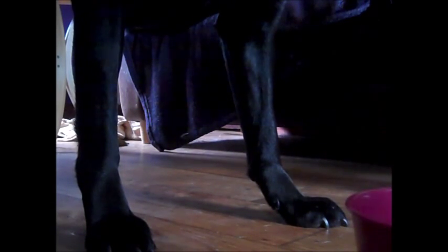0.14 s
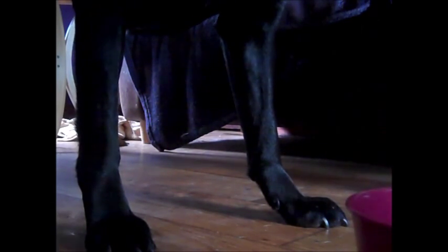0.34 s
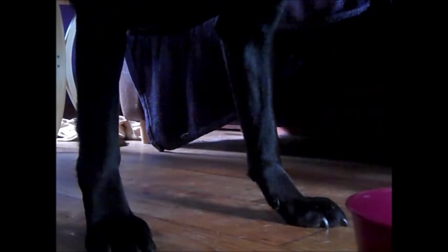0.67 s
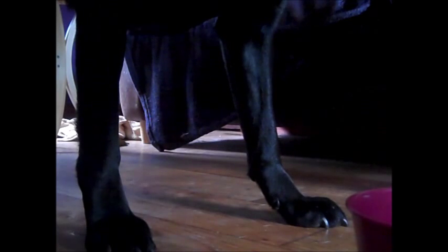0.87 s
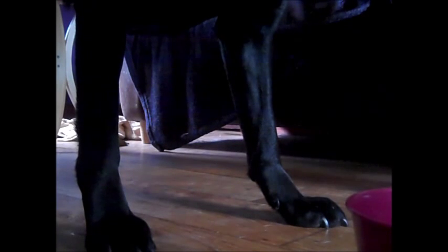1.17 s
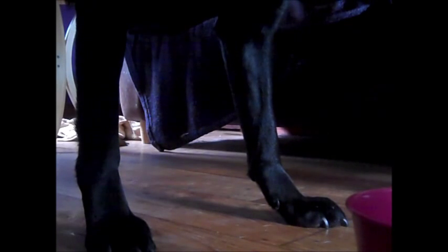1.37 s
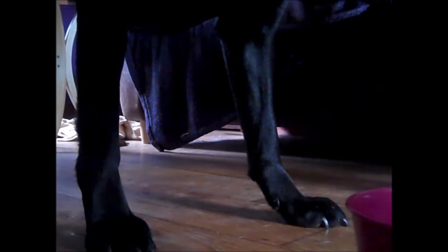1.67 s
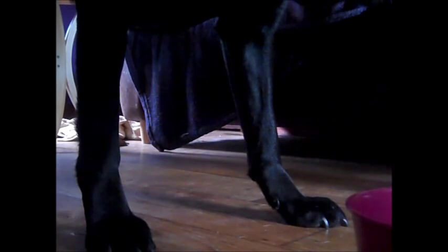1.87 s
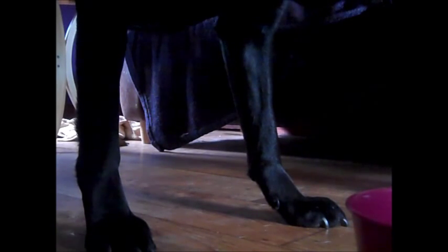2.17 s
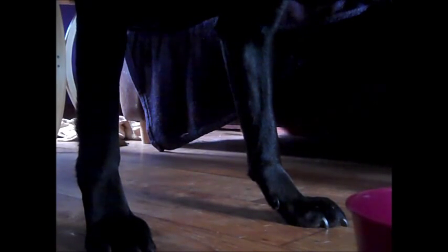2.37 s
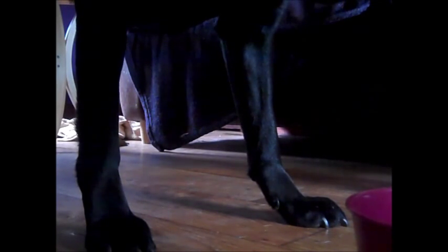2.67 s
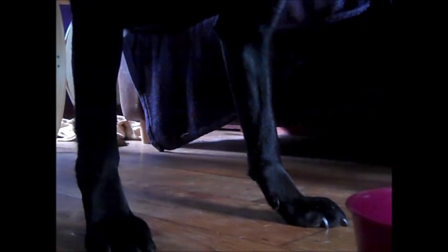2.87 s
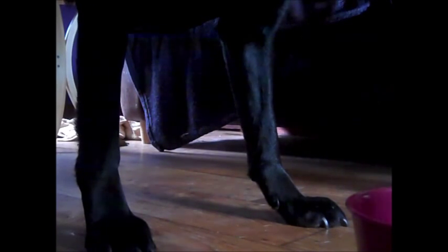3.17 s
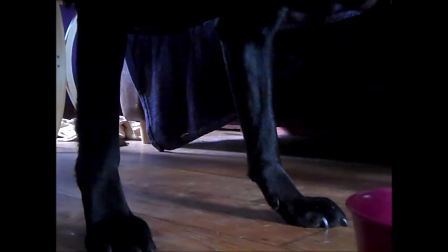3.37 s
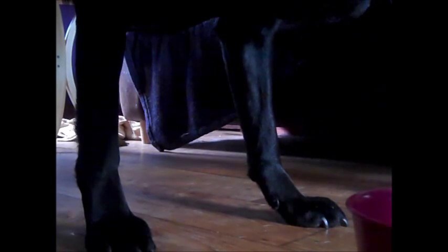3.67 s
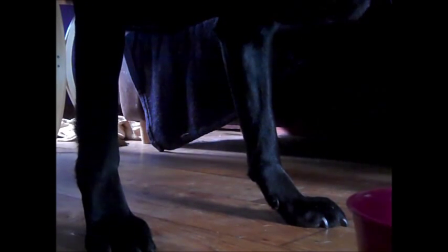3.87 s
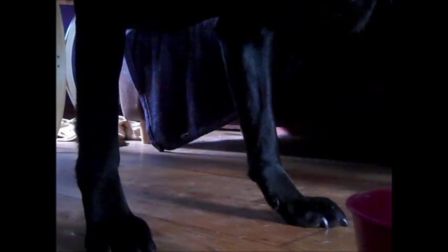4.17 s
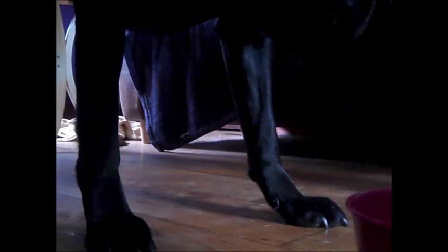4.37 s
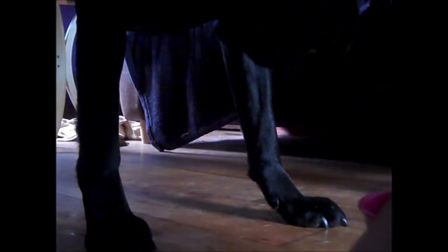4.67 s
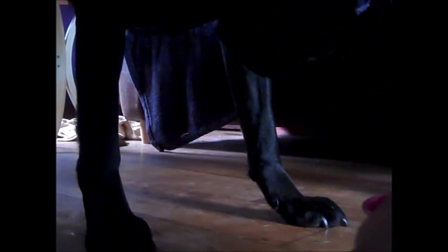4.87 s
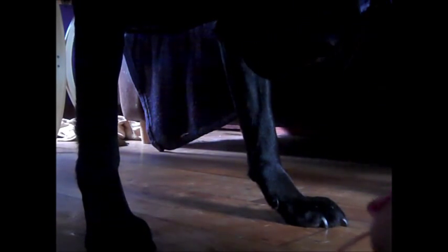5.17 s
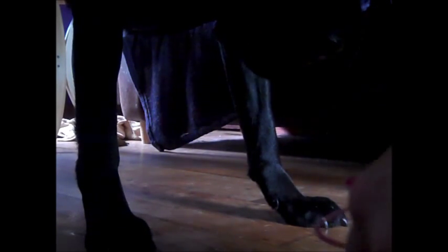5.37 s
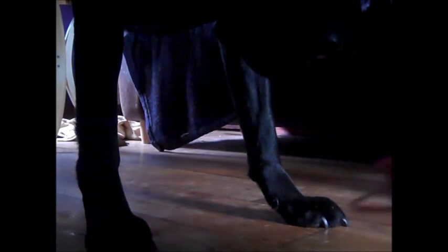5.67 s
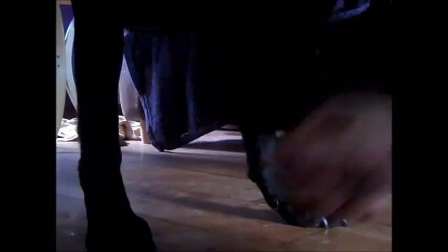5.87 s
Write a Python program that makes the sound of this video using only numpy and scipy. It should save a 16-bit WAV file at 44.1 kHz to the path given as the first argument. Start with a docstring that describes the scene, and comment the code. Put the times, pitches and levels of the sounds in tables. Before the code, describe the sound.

A soft rustle fades into faint appliance hum and room air. Suddenly two loud, bright clacks open a plastic container, with rapid rebounds. Brief lid handling leads to grainy scooping of dry pet food: rustling crunches, clicks and hollow plastic knocks, then freer rattling as the scoop lifts clear. Heard very close, a little right of centre, in a small furnished room, with the loudest peaks slightly clipped.

```python
"""A soft rustle dies away over a faint hum and the air of a quiet room, where dry pet food is served.
Two sharp snaps follow: latches crack open, rebound, and set a plastic tub and its lid ringing.
Then a hollow scoop digs: rubbing pellets are dense random contacts shaped by filters, while
scraping and single blows excite the modes of the scoop's wall and the air of its cavity.
Each nearby source reaches two ports with a small lag, early reflections and a diffuse tail."""
import sys
import numpy as np
from scipy import signal
from scipy.fft import rfft, irfft, next_fast_len
from scipy.io import wavfile
from scipy.ndimage import map_coordinates

SR = 44100
rng = np.random.default_rng(int(sys.argv[2]) if len(sys.argv) > 2 else 0)


def master(y):
    """Save y as 16-bit WAV."""
    cut = np.clip(np.atleast_2d(y).T, -1, 1)
    pcm = np.round(cut * 32767)  # scale
    wavfile.write(sys.argv[1], SR, pcm.astype(np.int16))


N = 266364  # length in samples

# Latches snapping open: start_s, crack_peak_db, tub_setting_db, lid_setting_db
# (the last two are relative to the crack, before the trims in latches)
LATCH_SNAPS = [(2.7003, 8, -6, -11.5), (2.848, 7.5, -34, -2.5)]
# Bending modes of the tub, then of its lid: centre_hz, width_hz, level_db
TUB_MODES = [(4620, 220, -6), (4890, 240, 0)]
LID_MODES = [(1434, 220, -3.5), (1534, 160, 0), (1766, 60, 2), (2550, 250, -6), (6130, 240, 3)]
# A latch rebounds at even steps; all rebounds lose REBOUND_DB of crack, and each one adds the losses below
BOUNCE_S, REBOUND_DB = 0.0116, 17
CRACK_LOSS_DB, TUB_LOSS_DB, LID_LOSS_DB = 3.5, 2.5, 5.5

# Hands taking hold of the lid: start_s, length_s, hiss_setting_db (before a trim), flex_db
LID_GRIPS = [(2.605, .1, -30, -39), (2.773, .06, -40, -46), (2.934, 0.028, -43, -33),
             (3.012, 0.25, -49, -53.5), (3.094, 0.023, -45, -51.5), (3.273, 0.014, -32, -58),
             (3.379, 0.061, -37.5, -51)]
GRIP_RISE_S, GRIP_T60_S = 0.018, 0.33
# Thin squeaks of the lid: centre_s, half_length_s, level_db, pitch_hz
LID_SQUEAKS = [(2.948, 0.0058, -29.5, 8280), (3.41, 0.017, -39, 8320)]
# Soft bumps of the tub and bowl: start_s, peak_db, top_hz, t60_s
SOFT_BUMPS = [(2.648, -29, 219, 0.27), (2.951, -24.5, 90, 0.14), (3.109, -32, 61, 0.25),
              (4.741, -26, 340, 0.28), (4.935, -34.5, 454, 0.21), (5.715, -31, 343, 0.1)]

# Strokes that set the kibble moving: start_s, rise_s, length_s (rise included), level_db,
# pressure_db (on the scoop); the layers in digging add trims of their own
SCOOP_STROKES = [(3.467, 0.015, 0.059, -27.5, -8.5), (3.578, 0.051, 0.054, -25, -4.5),
                 (3.738, 0.034, .09, -26, -5), (3.8, 0.038, 0.12, -20.5, -5.5),
                 (3.96, 0.034, 0.07, -30, -7), (4.033, 0.018, 0.32, -31.5, -17),
                 (4.37, 0.022, 0.085, -42.5, -5.5), (4.515, .04, 0.23, -34, -6.5),
                 (4.718, 0.027, 0.027, -27.5, -12), (4.808, 0.016, 0.36, -53, 1.5),
                 (4.956, 0.035, 0.042, -40.5, -4.5), (5.151, 0.064, .07, -45, -24),
                 (5.255, 0.026, 0.33, -39, 3), (5.607, 0.022, 0.089, -52, 14.5),
                 (5.717, 0.047, 0.096, -32, 0.5), (5.86, 0.033, 0.087, -37, -1)]
STROKE_T60_S = 0.28  # the pellets settle after each stroke
SCRAPE_DB, DRUM_DB = -8, -0.5  # wall and cavity, relative to level plus pressure
LIFT_S = 5.0  # the scoop is clear of the heap from here
FREE_WALL_DB = 2.5  # the wall rings more freely once clear
# Low resonance of the full tub: centre_hz, width_hz, level_db
HEAP_MODES = [(262, 125, 0)]

# Loudest pellets striking the scoop: start_s, strength_db, hardness (0 to 1)
PELLET_KNOCKS = [(3.284, -16.5, 1), (3.5372, -7.5, 0.74), (3.7796, -12, 0.81), (3.8345, -4, 0.62),
                 (3.869, -3.5, 0.6), (3.9024, -8.5, 0.18), (3.9686, -1.5, 0.6), (4.0051, -4.5, 0.72),
                 (4.0515, -12.5, 0.97), (4.0799, -5.5, .95), (4.28, -13.5, 0.88), (4.3154, -17, .95),
                 (4.5337, -14.5, 0.9), (4.6028, 3.5, 0.71), (4.6462, -12.5, 0.47), (4.6867, -1.5, 0.67),
                 (4.7524, -10.5, 0.82), (4.773, -7.5, 0.6), (5.2369, 6, 0.59), (5.2795, -10, 0.21),
                 (5.2995, -15, .2), (5.312, -15.5, 0.08), (5.3395, -15, 0.28), (5.3641, -14.5, 0.17),
                 (5.3795, -18.5, 0.06), (5.3926, 1.5, 0.94), (5.4, -7.5, .97), (5.4389, -8, .35),
                 (5.4962, -9, 0.64), (5.504, -10.5, 0.12), (5.5422, -10, 0.5), (5.5684, -1, 0.66),
                 (5.7845, -8.5, 0.3), (5.8045, -11, 0.6)]
# A dull blow loses click; a hard one loses wall and cavity
DULL_CLICK_DB, HARD_WALL_DB, HARD_CAVITY_DB = -21, -16, -35.5
SPOT_DB = 3.5  # scatter of the wall's mode levels from blow to blow
# Pitch of the air in the scoop: time_s, pitch_hz
CAVITY_PITCH = [(3.45, 678), (4.2, 695), (4.6, 640), (5.3, 678), (5.6, 718), (5.76, 783)]
# Bending modes of the scoop's wall: centre_hz, width_hz, level_db
WALL_MODES = [(1590, 226, -1), (2230, 140, 3), (2800, 370, -5), (3930, 280, -6), (5050, 380, -2.5)]
# Small ticks: start_s, peak_db
SMALL_TICKS = [(0.538, -46.5), (0.653, -45), (0.869, -48), (2.926, -20), (3.201, -31)]

# Spectra of latch crack, pellet click, rubbing kibble, sliding plastic, flexing lid and room air:
# frequency_hz, density_db (per hertz, relative)
CRACK_SPECTRUM = [(900, -12), (1450, 3), (2600, -6), (3500, -6), (4800, 6.5), (6400, -4.5), (8000, -3.5),
                  (14000, -15)]
CLICK_SPECTRUM = [(300, -55.5), (1000, -5.5), (5200, 8.5), (6800, 10.5), (9000, 3), (15000, -50)]
RUB_SPECTRUM = [(60, -31.5), (450, -9.5), (1200, -5.5), (3000, 0), (7300, -3.5), (14000, -24), (16000, -83)]
SLIDE_SPECTRUM = [(200, -44), (1500, -9), (4000, -3.5), (8300, 4), (14000, -16.5), (16000, -36)]
FLEX_SPECTRUM = [(30, 2), (150, -1.5), (400, -2.5), (900, -11.5), (6000, -38)]
AIR_SPECTRUM = [(20, -11), (65, 0), (250, -7), (1000, -17.5), (5000, -28.5), (14000, -35), (15500, -70)]

# Tones of the appliance: pitch_hz, level_db (rms)
HUM_TONES = [(59.6, -68.5), (119.6, -52.5)]
# Faint stirrings in the room: centre_s, level_db, pitch_hz
ROOM_STIRS = [(1.94, -60.5, 360), (2.05, -62, 520)]
STIR_WIDTH_HZ = 70
# Decay of the diffuse tail: frequency_hz, t60_s
ROOM_DECAY = [(5000, 0.37), (14000, 0.17)]
EARLY_DB = -21  # each early reflection from floor and furniture
# Responses of the left and right microphone ports: frequency_hz, gain_db
LEFT_PORT = [(100, -2.5), (6500, -1), (7900, 7), (9800, 3.5), (13000, -0.5)]
RIGHT_PORT = [(100, -2.5), (5000, -1.5), (6600, 6), (7900, -4), (11000, -10.5)]
TOP_HZ = 15300  # upper band edge


def latches():
    """Impact and modal ringing: each snap and its fading rebounds crack and excite the tub and lid."""
    out = np.zeros(N)
    for start, db, tub_db, lid_db in LATCH_SNAPS:
        for k in range(5):
            s = start + k * BOUNCE_S
            crack_db = db - REBOUND_DB * (k > 0) - k * CRACK_LOSS_DB
            crack = peak(coloured(burst(t60=0.015), CRACK_SPECTRUM))
            # twice through the modes, for narrower resonances
            tub = peak(resonant(resonant(burst(t60=0.023), TUB_MODES), TUB_MODES))
            lid = peak(resonant(burst(t60=0.023), LID_MODES))
            add(out, s, amp(crack_db) * crack)
            add(out, s, amp(db + tub_db - 7.5 - k * TUB_LOSS_DB) * tub)
            add(out, s, amp(db + lid_db - 6.0 - k * LID_LOSS_DB) * lid)
    return out


def handling():
    """Friction: at each grip the lid slides with a fine hiss and flexes; twice it squeaks thinly."""
    _, _, hiss_db, flex_db = np.transpose(LID_GRIPS)
    shapes = [stroke(s, GRIP_RISE_S, length, GRIP_T60_S) for s, length, _, _ in LID_GRIPS]
    contacts = grains(rate=5200, spread_db=2, t60=0.0049)
    hiss = together(hiss_db - 7, shapes) * unit(coloured(contacts, SLIDE_SPECTRUM))
    flex = together(flex_db, shapes) * noise(FLEX_SPECTRUM)
    squeaks = sum(amp(db) * swell(s, half, hz, width_hz=68) for s, half, db, hz in LID_SQUEAKS)
    return hiss + flex + squeaks


def bumps():
    """Soft impact: dull knocks of hand and plastic hold only a low band, two octaves wide."""
    out = np.zeros(N)
    for s, db, top_hz, t60 in SOFT_BUMPS:
        band = signal.butter(2, [top_hz / 4, top_hz], "bandpass", fs=SR, output="sos")
        add(out, s, amp(db) * peak(signal.sosfilt(band, burst(t60, size=16384))))
    return out


def digging():
    """Granular friction: pellets rub and crackle, scrape the scoop's wall and drum on its cavity."""
    *_, db, pressure_db = np.transpose(SCOOP_STROKES)
    shapes = [stroke(s, rise, length, STROKE_T60_S) for s, rise, length, _, _ in SCOOP_STROKES]
    motion = together(db, shapes)
    on_wall = together(db + SCRAPE_DB + pressure_db, shapes) * amp(FREE_WALL_DB * ~in_heap())
    on_cavity = together(db + DRUM_DB + pressure_db, shapes)

    crackle = 1.2 * unit(grains(rate=150, spread_db=4, t60=0.012))
    pellets = unit(grains(rate=1400, spread_db=1.5, t60=0.033)) + crackle
    wall_contacts = grains(rate=380, spread_db=4, t60=0.003)
    cavity_contacts = grains(rate=400, spread_db=2.5, t60=0.0035)

    rub = amp(-0.6) * motion * unit(coloured(pellets, RUB_SPECTRUM))
    scrape = on_wall * unit(resonant(wall_contacts, WALL_MODES))
    drum = on_cavity * unit(cavity(cavity_contacts, width_hz=58))
    rumble = amp(-21) * motion * unit(resonant(pellets * in_heap(), HEAP_MODES))
    return rub + scrape + drum + rumble


def knocks():
    """Contact stiffness: hard blows click, duller ones ring wall and cavity; in the heap the tub thuds."""
    out, blows = np.zeros(N), np.zeros(N)
    for s, db, hard in PELLET_KNOCKS:
        pellet = [(5400 * np.exp(rng.normal(0, 0.063)), 350, -3)]  # each pellet has its own pitch
        click = peak(coloured(burst(t60=0.025), CLICK_SPECTRUM))
        click = click + amp(-4.5) * peak(resonant(burst(t60=0.017), pellet))
        # each spot struck favours other modes
        spot = [(hz, width, mode_db + rng.normal(0, SPOT_DB)) for hz, width, mode_db in WALL_MODES]
        wall = peak(resonant(burst(t60=0.033), spot))
        thud = (s < LIFT_S) * peak(resonant(burst(t60=0.05), HEAP_MODES))
        add(out, s, amp(db + DULL_CLICK_DB * (1 - hard)) * click)
        add(out, s, amp(db + 0.6 + HARD_WALL_DB * hard) * wall)
        add(out, s, amp(db - 27.5) * thud)
        add(blows, s, amp([db + 0.62 + HARD_CAVITY_DB * hard ** 1.12]))
    return out + cavity(blows, width_hz=38)


def ticks():
    """Brief contact: each small tick is one fast-dying burst with the spectrum of sliding plastic."""
    out = np.zeros(N)
    for s, db in SMALL_TICKS:
        add(out, s, amp(db) * peak(coloured(burst(t60=0.011), SLIDE_SPECTRUM)))
    return out


def cavity(x, width_hz):
    """Air resonance: the scoop's pitch follows its filling and wavers as pellets shift."""
    shift = map_coordinates(rng.standard_normal(N // 900 + 4), [np.arange(N) / 900])
    times, pitches = np.transpose(CAVITY_PITCH)
    pitch = np.interp(np.arange(N) / SR, times, pitches) * np.exp(0.026 * shift)
    turn = np.exp(2j * np.pi * np.cumsum(pitch) / SR)
    # a one-pole decay in the frame that turns at the moving pitch
    ring = (turn * signal.lfilter([1], [1, -np.exp(-np.pi * width_hz / SR)], x / turn)).real
    # a small mouth radiates no bass
    return signal.sosfilt(signal.butter(4, 520, "highpass", fs=SR, output="sos"), ring)


def in_heap():
    """Damping and coupling: true while kibble damps the scoop's wall and couples it to the tub."""
    return np.arange(N) / SR < LIFT_S


def background():
    """Steady tones and diffuse noise: appliance hum, room air, stirrings and the opening rustle."""
    t = np.arange(N) / SR
    hum = sum(np.sqrt(2) * amp(db) * np.sin(2 * np.pi * (hz * t + rng.random())) for hz, db in HUM_TONES)
    shared_air = amp(-61.5) * noise(AIR_SPECTRUM)
    own_air = amp(-55) * np.array([noise(AIR_SPECTRUM), noise(AIR_SPECTRUM)])
    fade = amp(-59.5) * np.exp(-(t / 0.12) ** 2)
    rustle = fade * np.array([noise(SLIDE_SPECTRUM), noise(SLIDE_SPECTRUM)])
    stirs = sum(amp(db) * swell(s, 0.045, hz, width_hz=STIR_WIDTH_HZ) for s, db, hz in ROOM_STIRS)
    return hum + shared_air + own_air + rustle + stirs


def room(x):
    """Reverberation: a diffuse tail for each port, whose treble dies first."""
    _, t, z = signal.stft(hz_noise := rng.standard_normal((2, SR // 2)), SR, nperseg=256)
    hz = np.fft.rfftfreq(256, 1 / SR)
    tail = signal.istft(z * amp(-60 * t / along(ROOM_DECAY, hz)[:, None]), SR, nperseg=256)[1]
    tail = np.pad(tail / np.linalg.norm(tail[0]), ((0, 0), (SR // 250, 0)))  # starts 4 ms late
    return signal.fftconvolve(x[None], tail, axes=1)[:, :N]


def placed(x, lag_ms, room_db):
    """Interaural lag and reflection: sound from the right reaches the left port later, then echoes."""
    lag = lag_ms / 1000
    direct = filtered(x, lambda hz: np.exp(1j * np.pi * hz * lag * np.array([[-1], [1]])))
    early = np.zeros((2, SR // 40))
    for port in early:
        port[rng.integers(SR // 900, SR // 50, size=8)] = rng.choice([-1, 1], size=8) * amp(EARLY_DB)
    return direct + signal.oaconvolve(x[None], early, axes=1)[:, :N] + amp(room_db) * room(x)


def stroke(start, rise, length, t60):
    """Movement envelope: linear rise, hold, and exponential decay once the length is over."""
    t = np.arange(N) / SR - start
    return np.clip(t / rise, 0, 1) * amp(-60 * np.maximum(t - length, 0) / t60)


def together(levels_db, shapes):
    """Energy addition: the joint level of overlapping movements."""
    return np.sqrt(amp(levels_db) ** 2 @ np.square(shapes))


def swell(s, half, hz, width_hz):
    """Narrow-band noise: it rises and falls around one moment."""
    band = unit(filtered(rng.standard_normal(N), lambda f: np.exp(-((f - hz) / width_hz) ** 2)))
    return band * np.exp(-((np.arange(N) / SR - s) / half) ** 2 / 2)


def grains(rate, spread_db, t60, count=12):
    """Random contacts: hits of unequal force among several pellets, each with its own ring."""
    force_db = spread_db * np.clip(rng.standard_normal((count, N)), -2, 2)
    hits = (rng.random((count, N)) < rate / count / SR) * amp(force_db)
    rings = np.array([burst(t60, size=1024) for _ in range(count)])
    return signal.oaconvolve(hits, rings, axes=1).sum(0)[:N]


def burst(t60, size=4096):
    """Decaying noise: the dense, fast-dying ring of one contact."""
    return rng.standard_normal(size) * amp(-60 * np.arange(size) / SR / t60)


def resonant(x, modes):
    """Modal resonance: parallel band-pass modes of alternating sign."""
    def response(f):
        total = 0
        for k, (centre, width, db) in enumerate(modes):
            damping = 1j * f * width
            total = total + (-1) ** k * amp(db) * damping / (centre * centre - f * f + damping)
        return total
    return filtered(x, response)


def noise(spectrum):
    """Stationary noise: a coloured spectrum at rms 1."""
    return unit(filtered(rng.standard_normal(N), lambda hz: amp(along(spectrum, hz))))


def coloured(x, spectrum, size=1024):
    """Minimum-phase filtering: the folded cepstrum gives a causal filter of this spectrum."""
    cepstrum = irfft(np.log(amp(along(spectrum, np.fft.rfftfreq(size, 1 / SR)))))
    cepstrum[1:size // 2] *= 2
    cepstrum[size // 2 + 1:] = 0
    return signal.fftconvolve(x, irfft(np.exp(rfft(cepstrum))))[:len(x)]


def filtered(x, response):
    """Linear filtering: multiply the spectrum by a complex response of frequency."""
    n = x.shape[-1]
    m = next_fast_len(n + SR // 10, True)
    return irfft(rfft(x, m) * response(np.fft.rfftfreq(m, 1 / SR)), m)[..., :n]


def along(points, hz):
    """Logarithmic frequency: interpolate (frequency_hz, value) points on a log axis."""
    f, v = np.transpose(points)
    return np.interp(np.log(hz + 1), np.log(f + 1), v)


def add(track, s, sound):
    """Superposition: add a sound to a track at a time in seconds."""
    part = track[max(round(s * SR), 0):][:len(sound)]
    part += sound[:len(part)]


def amp(db):
    """Decibels to amplitude gain."""
    return 10 ** (np.asarray(db) / 20)


def unit(x):
    """Normalisation to rms 1."""
    return x / np.sqrt(np.mean(x ** 2) + 1e-20)


def peak(x):
    """Normalisation to peak 1."""
    return x / (np.abs(x).max() + 1e-20)


def scene():
    """Superposition of near sources to the right; the scoop is a little louder in the right port."""
    tub = placed(latches(), lag_ms=0.073, room_db=-14.5)
    tub = tub + placed(handling() + bumps(), lag_ms=0.071, room_db=-13)
    scoop = placed(digging(), lag_ms=0.073, room_db=-13)
    scoop = scoop + placed(knocks() + ticks(), lag_ms=0.065, room_db=-18.5)
    return tub + scoop * amp([[-0.6], [0.6]]) + background()


def record(dry):
    """Port resonance and saturation: each port colours the treble, peaks clip, the band ends steeply."""
    ports = np.array([coloured(dry[0], LEFT_PORT), coloured(dry[1], RIGHT_PORT)])
    return filtered(np.clip(ports, -0.88, 0.88), lambda hz: 1 / (1 + (hz / TOP_HZ) ** 70))


dry = scene()
out = record(dry)
master(out)
```